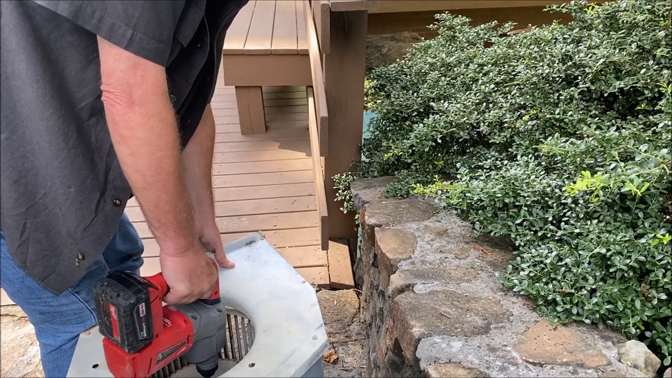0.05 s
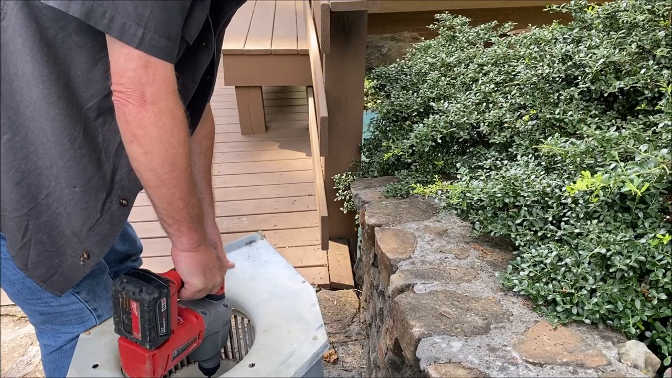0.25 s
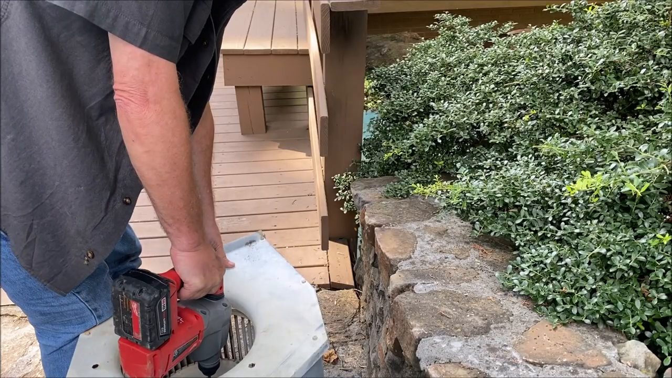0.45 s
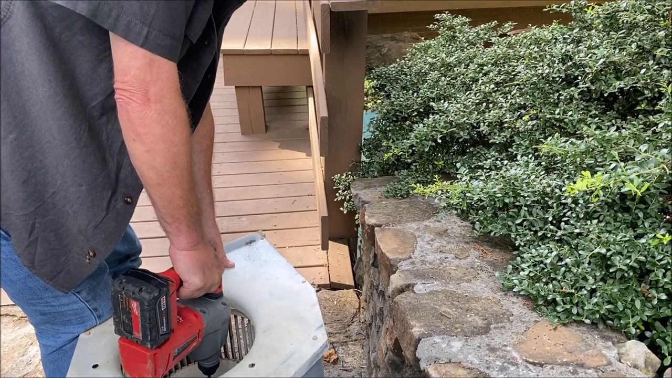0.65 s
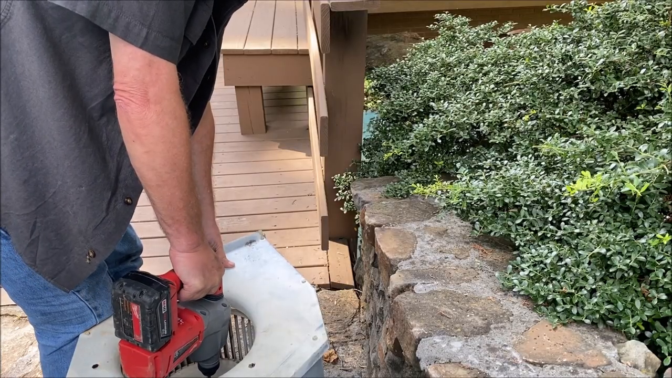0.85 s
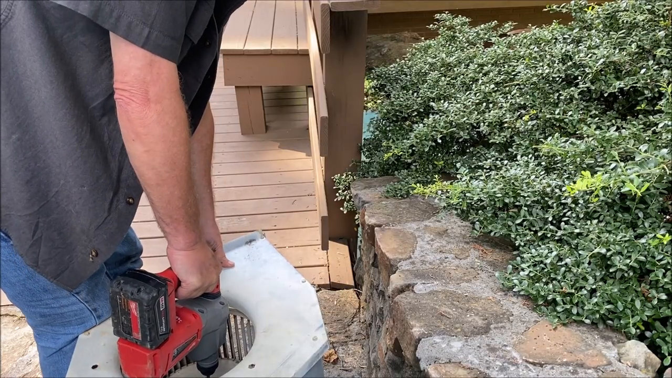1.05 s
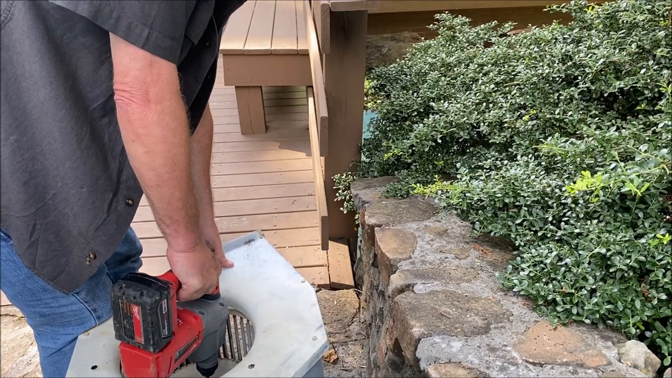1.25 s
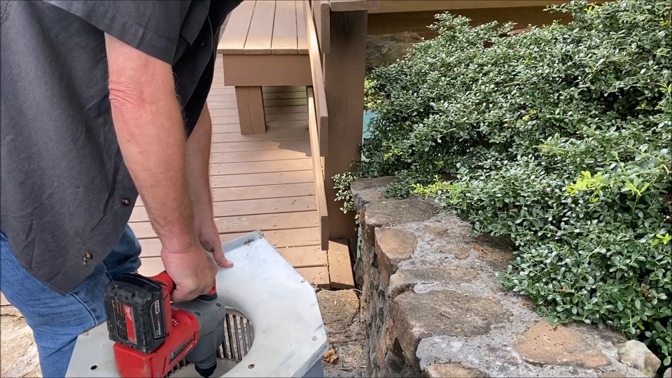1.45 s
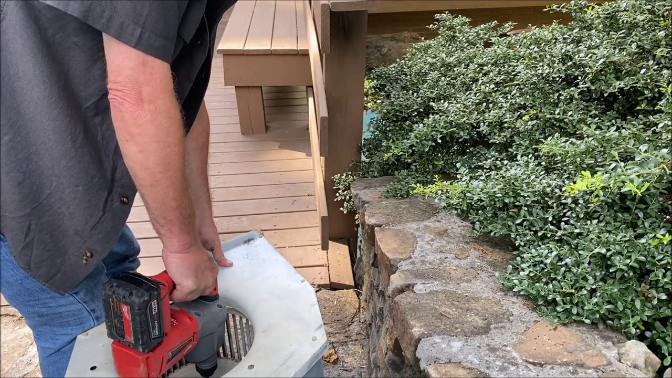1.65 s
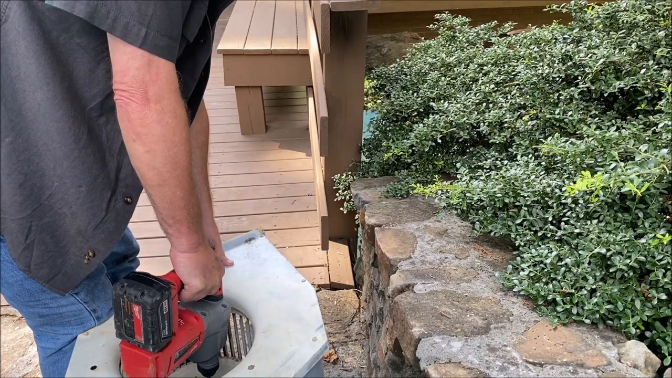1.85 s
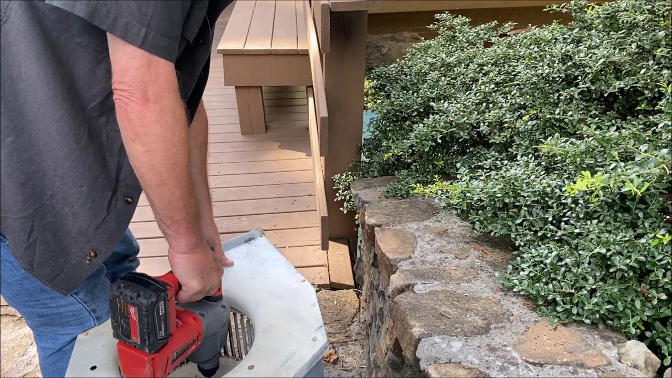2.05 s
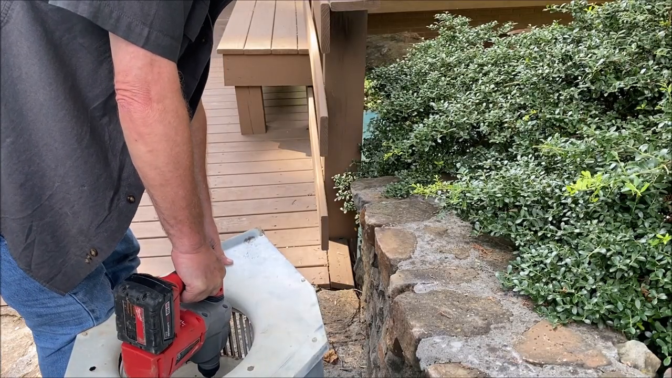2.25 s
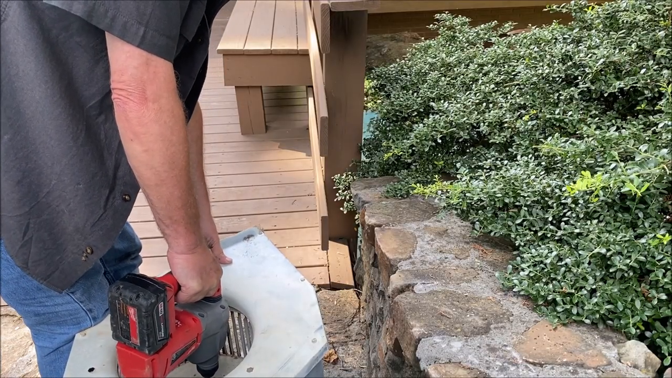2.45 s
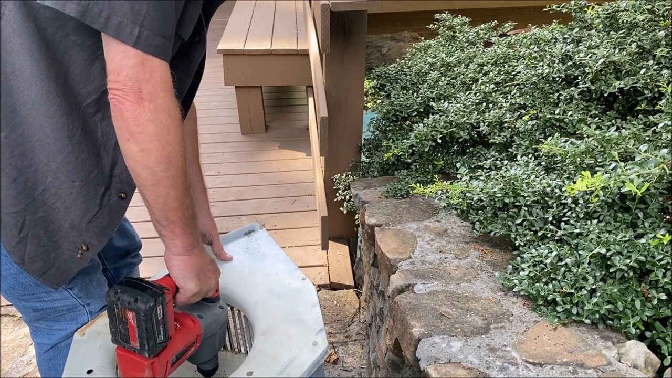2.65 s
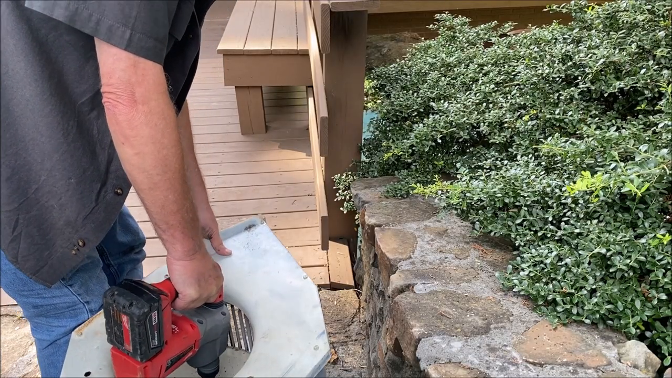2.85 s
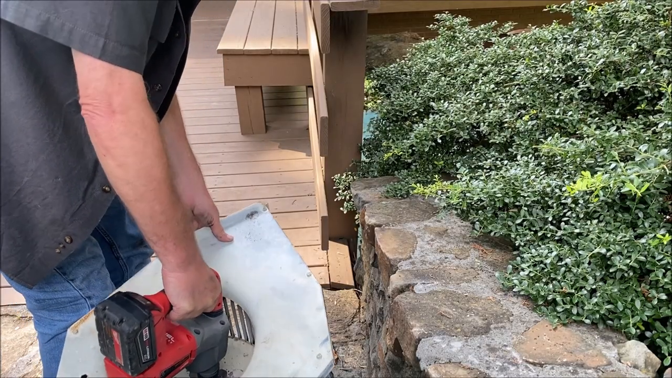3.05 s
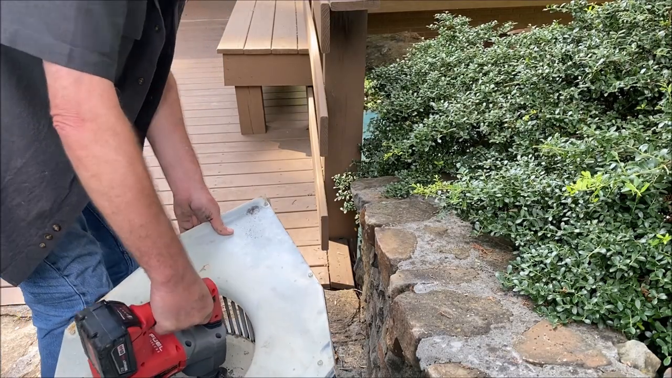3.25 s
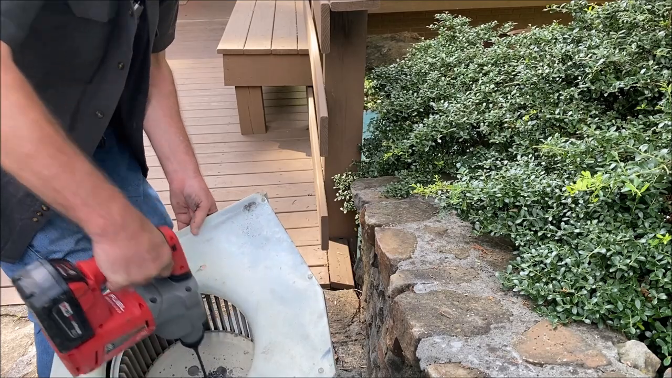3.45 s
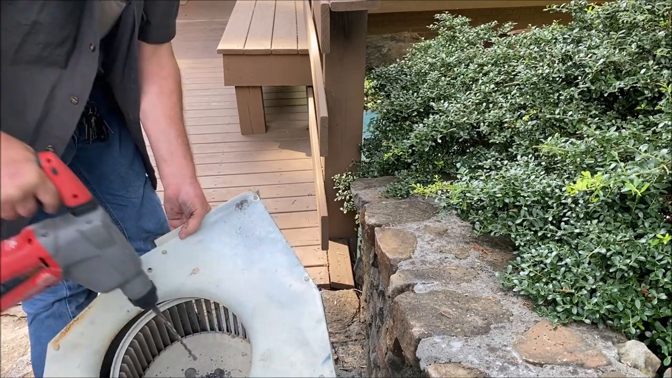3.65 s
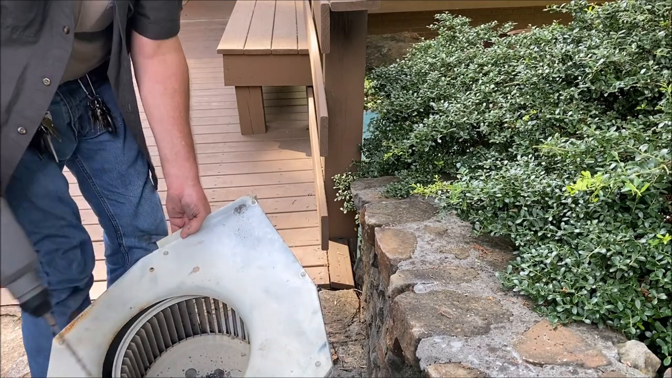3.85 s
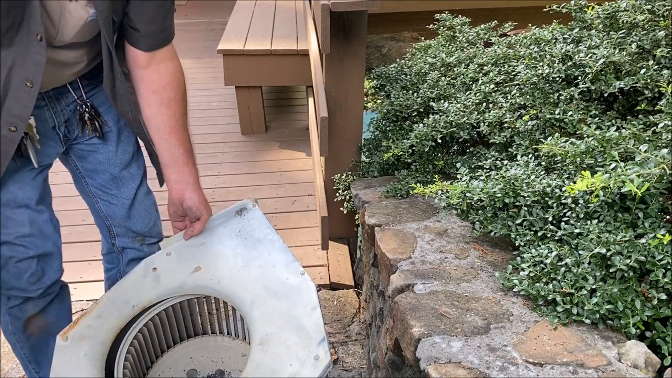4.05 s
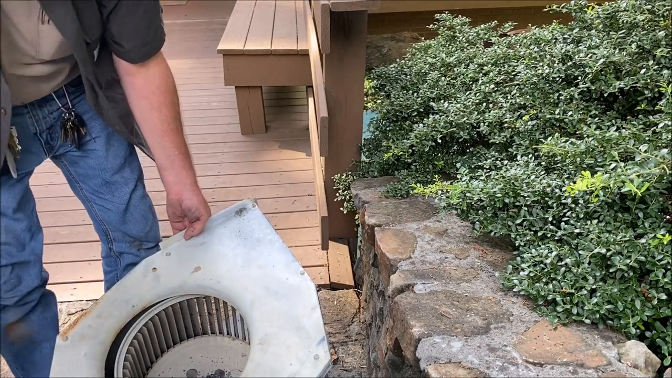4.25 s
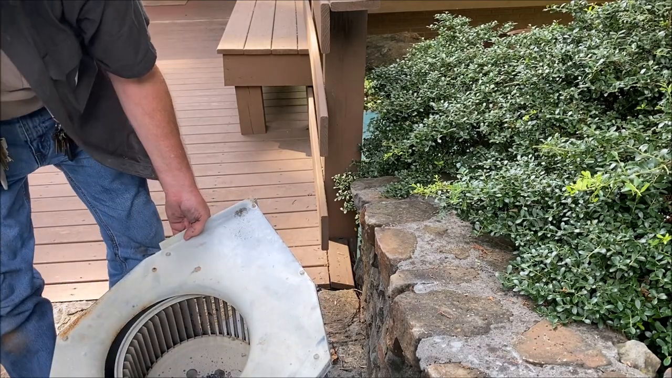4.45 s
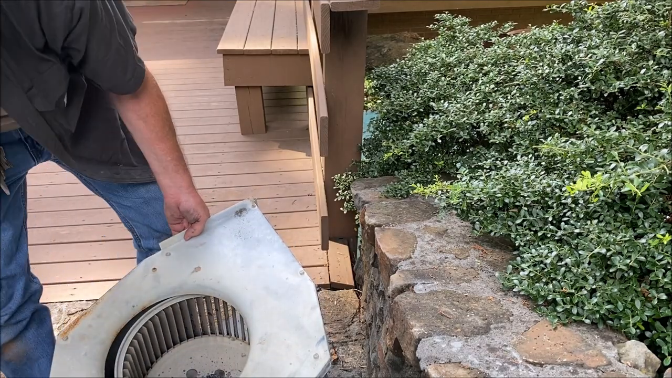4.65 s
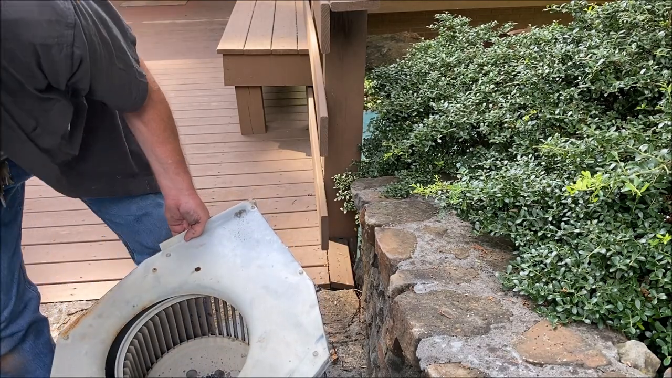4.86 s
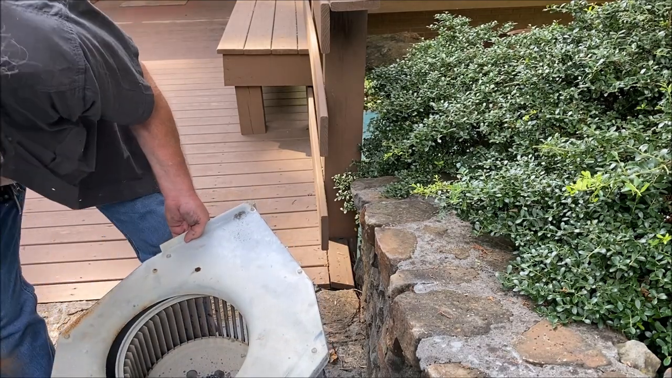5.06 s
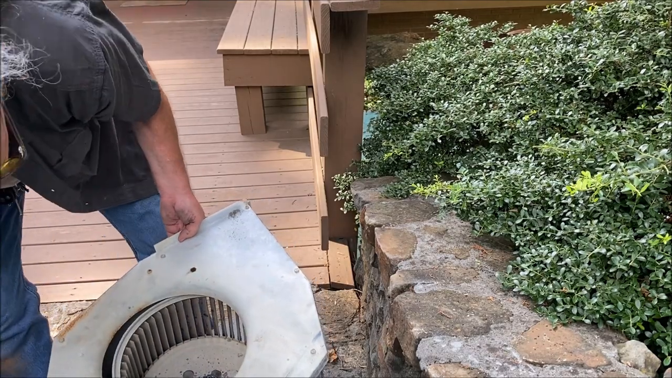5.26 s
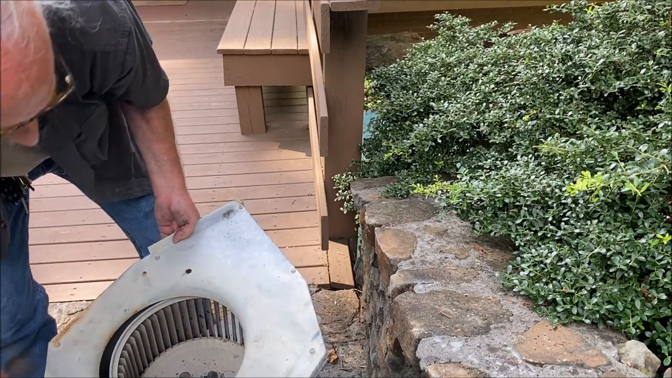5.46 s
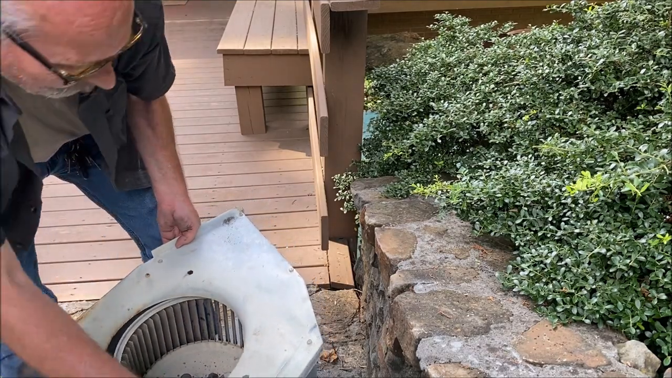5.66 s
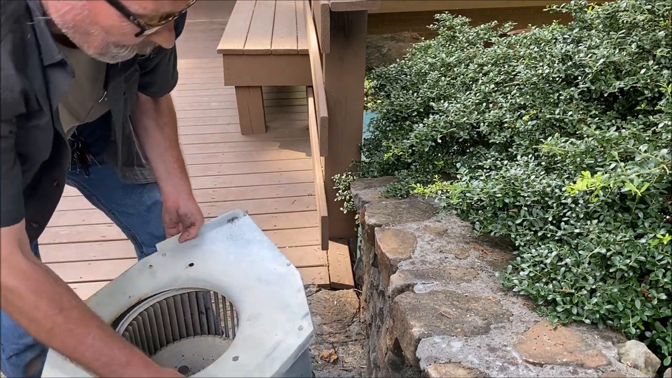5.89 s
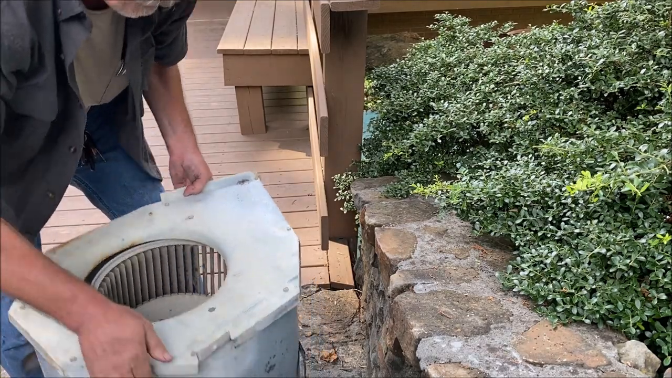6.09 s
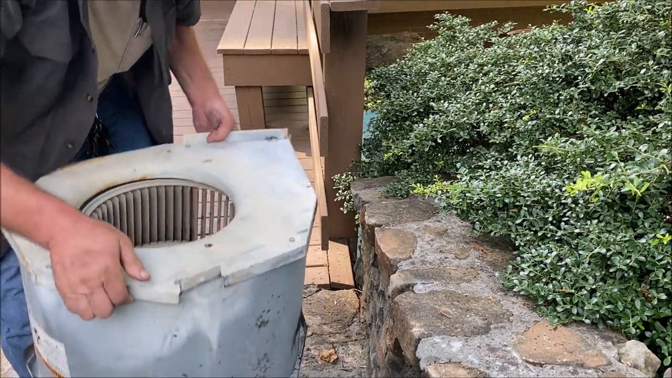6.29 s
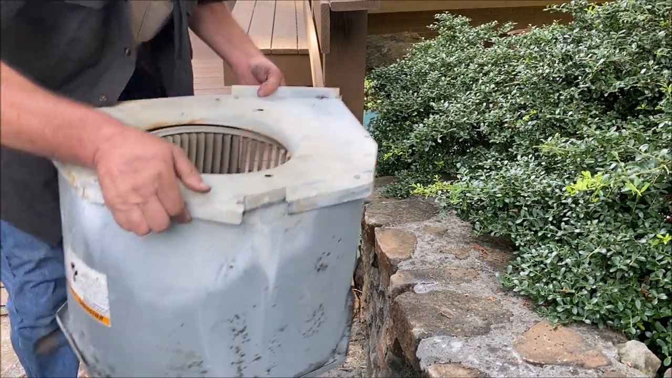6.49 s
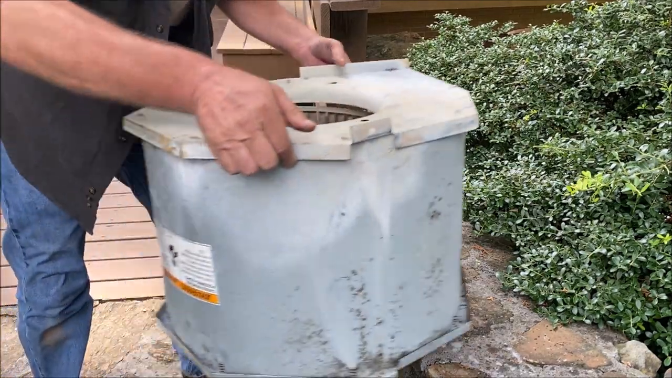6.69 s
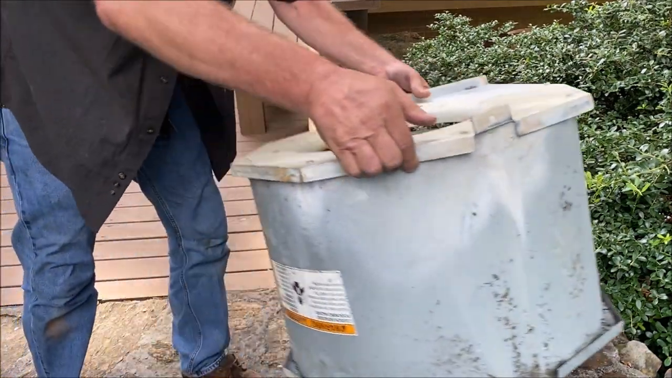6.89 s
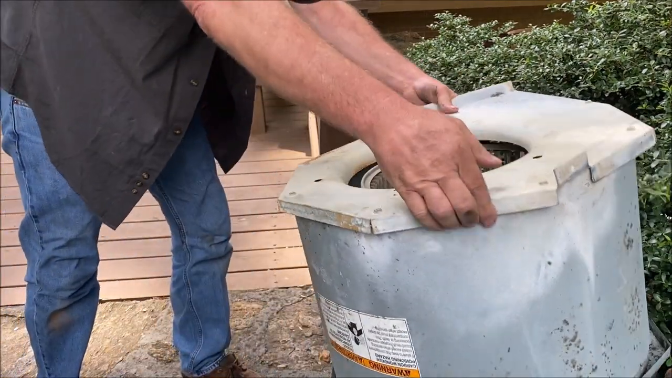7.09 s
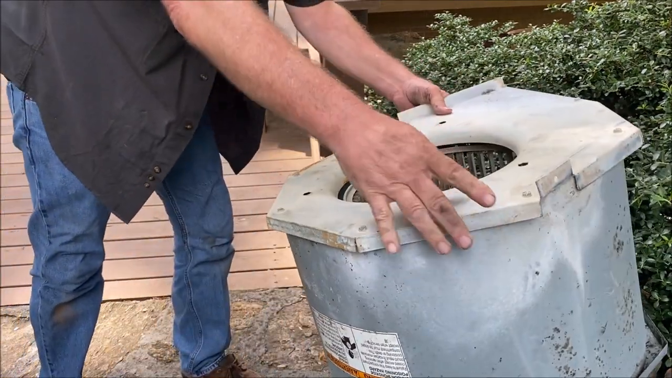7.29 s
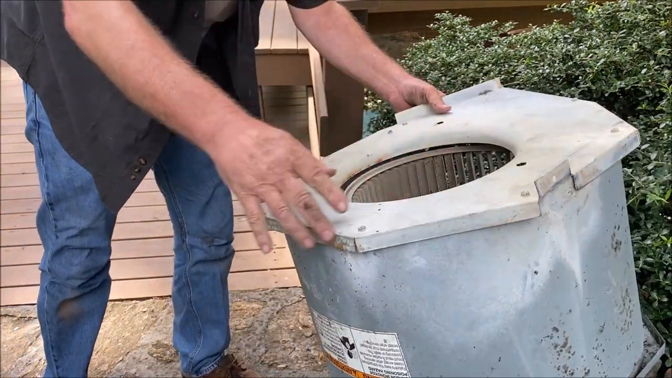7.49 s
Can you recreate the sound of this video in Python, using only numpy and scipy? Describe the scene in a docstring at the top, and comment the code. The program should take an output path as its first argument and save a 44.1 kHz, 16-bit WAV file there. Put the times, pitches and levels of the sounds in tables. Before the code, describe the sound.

Close outdoors on a wooden deck, a rotary hammer batters a fan shaft inside a thin metal drum, about fifty-five blows a second, with hum, clang and loose rattle. It presses harder, lifts off into uneven chatter and stops. Quiet air follows, with light knocks, faint keys and a tiny bird whistle. The tool is laid down with a sharp clatter; the drum is shuffled, lifted and set down with hollow metallic bangs.

```python
"""Hammered fan in a sheet-metal drum

A rotary hammer strikes the shaft of a fan inside a drum on a wooden deck outdoors, then lifts off. Periodic
blows excite damped modes, loose metal and a harmonic hum. The tool is laid down with a clatter and the drum
is handled, lifted and set down: noise bursts and sliding noise excite its modes. Keys jingle as flurries of
impulses, and a far bird whistles as a gliding sine. Two microphone ports, echoes and outdoor air surround all.
"""
import sys
import numpy as np
from scipy import signal
from scipy.fft import rfft, irfft
from scipy.io import wavfile
from scipy.ndimage import uniform_filter1d

SR = 44100
rng = np.random.default_rng(int(sys.argv[2]) if len(sys.argv) > 2 else 0)


def dump(signal):
    """Clip the signal to [-1, 1] and save it as 16-bit WAV at the path in sys.argv[1]."""
    limited = np.clip(np.atleast_2d(signal).T, -1, 1)
    pcm = np.round(limited * 32767).astype(np.int16)
    wavfile.write(sys.argv[1], SR, pcm)


N = 332073

# Blow rate: the motor sags under load, then runs down [t/s, rate/(blows per s)]
BLOW_RATE_CURVE = [(0, 56.4), (.25, 56.4), (.38, 55.6), (.7, 56.15), (1.5, 55.9), (2.2, 55.1),
                   (3.05, 54.65), (3.335, 53.0), (3.365, 41), (3.46, 25)]
# Pressure of the bit on the shaft [t/s, pressure/(0 to 1)]
PRESSURE_CURVE = [(1.3, 0.15), (1.7, 0.97)]
# Modes of shaft and fan [f/Hz, relative level held lightly/dB, relative level pressed hard/dB, t60/s]
SHAFT_MODES = [(884, -12, -7.5, 0.07), (1072, -11, -12, 0.062), (1269, -10, 0.5, .08),
               (1423, -6, -6.5, 0.1), (1663, 2, 1.5, 0.096), (2140, -12.5, -4, .03), (3124, -1, -16, 0.037),
               (3490, -20, -15, .04), (3730, -6, -12, .05), (4720, -7, -7, 0.019),
               (6280, -7.5, -10.5, 0.037)]
# Spectral density of loose blades and gears [f/Hz, relative level/dB per Hz]
RATTLE_SPECTRUM = [(35, -47), (60, -28), (217, -8), (842, -6.5), (1700, -5), (2090, -7), (7230, -12),
                   (8510, -19), (10800, -15), (13300, -15), (16000, -7)]
# Hum of the drum under the blows [t/s, third order level/dB, fourth order level/dB,
# sixth order level/dB, level of the wall hum/dB]
HUM_CURVE = [(0, -44.5, -38, -53, -32.5), (.3, -46, -36, -36, -34.5), (.85, -52, -41.5, -56.5, -34),
             (1.17, -42.5, -40, -48, -33), (1.52, -48.5, -45, -47.5, -32), (1.75, -39, -40.5, -38.5, -27.5),
             (2.0, -40.5, -49, -44, -31), (2.3, -51.5, -44.5, -48, -32), (2.66, -47, -53.5, -43.5, -32.5),
             (3.1, -59, -49.5, -69.5, -28.5)]
# Orders in the wall hum [multiple of blow rate, relative level held lightly/dB, relative level pressed hard/dB]
WALL_ORDERS = [(2, -10, -21), (5, -2.5, -17.5), (7, -7, -10.5), (8, 5, -3.5), (9, 6.5, -6.5), (10, 6, 2),
               (11, -2.5, -8.5), (12, 0.5, -5.5), (13, -9.5, -9), (14, -11, -10.5), (15, -19, -11),
               (16, -10.5, -14.5)]
# Spectral density of the outdoor floor [f/Hz, relative level/dB per Hz]
AIR_SPECTRUM = [(15, -39), (25, -14.5), (70, 1), (123, -12), (185, -13), (229, -27.5), (2350, -36.5),
                (4370, -39.5), (5570, -46.5), (7110, -47), (16000, -58.5)]
# Level of the drum's murmur while it is held [t/s, level/dB]
MURMUR_CURVE = [(3.4, -48), (3.56, -60.5), (4.0, -64.5), (4.8, -74.5), (5.36, -63.5), (5.48, -39),
                (5.66, -53), (6.35, -63.5), (6.62, -63), (7.1, -54), (7.26, -43), (7.53, -50.5)]
# Low modes of the drum [f/Hz, relative level/dB, t60/s]
DRUM_MODES = [(88.1, -11, 0.41), (164, -5.5, 0.12), (223.2, -6.5, 0.41), (277, 2, 0.077), (370, -12, 0.083),
              (448, -2.5, 0.039)]
# Hands and cloth sliding on the drum [loudest t/s, level/dB, time to fade 20 dB/s]
SLIDE_EVENTS = [(3.499, -50, 0.5), (4.79, -77, 0.06), (4.865, -84, 0.1), (5.011, -55.5, 0.4),
                (5.2, -65, 0.2), (5.37, -41.5, 0.18), (5.485, -44.5, 0.1961), (5.8, -71, 0.4),
                (6.6, -72.5, 1), (7.03, -56.5, 0.22), (7.15, -38.5, 0.2363), (7.41, -47, 0.23)]
# Spectral density of the sliding noise [f/Hz, relative level/dB per Hz]
SCUFF_SPECTRUM = [(240, -36.5), (400, -6), (1460, -5.5), (5430, -19.5), (6240, -20.5), (8370, -24.5),
                  (11200, -23.5), (13300, -20.5), (16000, -22)]
# Knocks [t/s, reference level/dB, relative bass level/dB, treble tilt/dB, reference t60/s,
# rise time constant/ms, body f/Hz]
KNOCK_EVENTS = [(3.618, -49, -23, -9, 0.18, 2, 1090), (3.844, -59, -15.5, 7.5, 0.26, 2.45, 1270),
                (4.076, -72, 16, -3, 0.072, 1.2, 2560), (4.732, -68.5, 1, 6, 0.38, 12, 715),
                (4.946, -57, 5, -3, 0.2, 0.41, 520), (5.096, -47, -2, 7.5, 0.059, 0.74, 2230),
                (5.279, -54, -11.5, -1, 0.14, 1.6, 1190), (5.3027, -25.5, -2, -1, 0.051, 0.38, 1210),
                (5.3335, -33, -10, 2, 0.035, 0.47, 4400), (5.344, -29, -5, 5, 0.044, 0.93, 3480),
                (5.352, -27, 2.5, 1.5, 0.061, 2, 555), (5.441, -36.5, 1.5, 4.5, 0.06, .3, 3470),
                (5.94, -46.5, -9, -8, 0.24, 5.7, 1900), (5.952, -47, -11, -21, 0.36, 2.9, 960),
                (6.356, -64, -6, 10.5, 0.44, 3.1, 2590), (6.46, -41, -1.5, -13.5, 0.27, 14, 810),
                (7.086, -26.5, -5, -2, 0.26, 1.5, 1010), (7.116, -27, -5, 0.5, 0.23, 5.3, 1760),
                (7.281, -41.5, -10, 2.5, 0.41, 6.9, 3250), (7.333, -32, -4.5, -6, 0.13, .8, 1350),
                (7.395, -45.5, -19, 9, 0.13, 2.4, 2820)]
# Spectral density of the knocks' noise [f/Hz, relative level/dB per Hz]
KNOCK_SPECTRUM = [(29, -38), (50, -12), (91, -4), (300, -2), (900, -6), (3410, -13), (8340, -26),
                  (10600, -21), (13500, -26), (16000, -18)]
# Higher modes of the drum's panels, rung by knocks [f/Hz]
PANEL_MODES = [508, 762, 887, 1120, 1306, 1777, 2089, 2900]
# Touches of the keys [t/s, strength level/dB]
KEY_TOUCHES = [(4.158, -82), (4.1936, -76.5), (4.23, -71)]
# Modes of the keys [f/Hz, relative level/dB, t60/s]
KEY_RESONANCES = [(2900, -3, .012), (5600, -2, .008), (6300, 0, .008), (7000, -3, .008)]
# Phase between the microphone ports [f/Hz, lead of the left port/rad]
PORT_LEAD = [(0, -3.5), (780, 1.3458), (2240, 2), (3530, -0.5), (4050, 7.5), (4740, 6.5), (5940, 5.5),
             (7060, 5), (10400, -0.1), (11400, 2), (13100, -13.5), (13700, -29.5), (15200, -3.5),
             (16600, -1)]
# Balance of the microphone ports [f/Hz, left minus right level/dB]
PORT_LEVELS = [(60, -7), (150, -2), (380, -2.5), (950, 0), (2380, 2), (5980, 2.5), (15000, -1)]

# The bit comes off the shaft: the walls fall quiet
LIFT_S, LIFT_TAKES_S, LIFT_WALL_DB, LIFT_CLANG_DB = 2.67, .09, -23, -13.5
# The trigger is let go, the motor runs down, then stops
RELEASE_S, RUNDOWN_DB_PER_S, STOP_S, STOP_DB_PER_S = 3.326, 116.5, 3.405, 349
RATTLE_DB, CLANG_DB, CLANG_PRESSED_DB = -34.5, -40.5, 5.5
# The bit slips for a moment and a panel sings out
SLIP_S, SLIP_LASTS_S, SLIP_HZ, SLIP_DB = 1.185, .04, 1487, 5.5
# Striker ticks, clearer once the bit is free and again as the motor runs down
TICK_DB, TICK_FREED_DB, TICK_IDLE_DB, TICK_T60_S = -43, 4, 6, .01
HUM_LAG_CYCLES = .42
REBOUND_CYCLES = .32
AIR_DB = -63
SLIDE_RISES_FASTER = 2.4  # ratio of rising slope to fading slope, in dB per s
CRACK_DB, CRACK_T60_S = 12, .011
DRUM_RING_DB, PANEL_RING_DB, PANEL_T60_S = -29, -29, .19
BIRD_S, BIRD_LASTS_S, BIRD_FROM_HZ, BIRD_TO_HZ, BIRD_DB = 4.5, .2, 3350, 4550, -82
ECHO_DB, ECHO_T60_S = -8, .06  # level ahead of the echoes' band limits
NOTCH_HZ, NOTCH_WIDTH_HZ, NOTCH_SHARE = 13300, 1500, .7
CUTOFF_HZ = 16150

NOW = np.arange(N) / SR  # t/s
OPPOSITE_SIDES = np.array([[1], [-1]])


def from_db(db):
    """Logarithmic level: amplitude gain grows tenfold every 20 dB."""
    return 10 ** (np.asarray(db) / 20)


def rms_one(x):
    """Normalisation by effective value: the result has rms 1."""
    return x / np.sqrt(np.mean(x ** 2) + 1e-20)


def in_time(rows):
    """Linear interpolation: each column of a curve, one value a sample."""
    s, *columns = np.transpose(rows)
    return [np.interp(NOW, s, column) for column in columns]


def at_hz(points):
    """Interpolation on a logarithmic frequency axis, one value for every FFT bin."""
    hz, value = np.transpose(points)
    return np.interp(np.log(np.fft.rfftfreq(N, 1 / SR) + 1), np.log(hz + 1), value)


def band(x, low_hz, high_hz):
    """Band limitation: a Butterworth filter passes one range of frequencies."""
    return signal.sosfilt(signal.butter(2, [low_hz, high_hz], "band", fs=SR, output="sos"), x)


def noise(spectrum, unlike=1.0):
    """Coloured noise of rms 1: scattering makes the two sides partly unlike between 2600 and 9000 Hz."""
    white = rng.standard_normal((2, N))
    both, apart = irfft(rfft(white) * from_db(at_hz(spectrum)), N)
    return rms_one(both + unlike * band(apart, 2600, 9000) * OPPOSITE_SIDES)


def drift(rate_hz):
    """Low-pass random process: two equal poles make noise wander slowly, with rms 1."""
    r = np.exp(-2 * np.pi * rate_hz / SR)
    wandering = signal.lfilter([1], [1, -2 * r, r * r], rng.standard_normal(N + SR))
    return rms_one(wandering[SR:])  # the first second lets the filter settle


def ring(strikes, modes, wander_db):
    """Modal superposition: a force drives damped resonators, each mode's share wandering slowly."""
    out = np.zeros(N)
    for k, (hz, level_db, t60) in enumerate(modes):
        r, w = from_db(-60 / (t60 * SR)), 2 * np.pi * hz / SR
        sign = (-1) ** k
        force = sign * strikes * from_db(level_db + wander_db * drift(1.2))
        out += signal.lfilter([0, np.sin(w)], [1, -2 * r * np.cos(w), r * r], force + 1e-18)
    return out


def evened(x):
    """Running normalisation: rms 1 over every tenth of a second."""
    return x / np.sqrt(uniform_filter1d(x ** 2, size=SR // 10) + 1e-12)


def outdoor_air():
    """Superposed noise fields: a common part and a weaker opposed part spread the outdoor floor in width."""
    field = noise(AIR_SPECTRUM) + .36 * noise(AIR_SPECTRUM) * OPPOSITE_SIDES
    return from_db(AIR_DB + .85 * drift(3.5)) * field


def hum(turn, press, lifted):
    """Harmonic series: periodic blows drive the drum at multiples of their rate; pressing shifts the colour."""
    third_db, fourth_db, sixth_db, wall_db = in_time(HUM_CURVE)
    wall = np.zeros(N)
    for k, light_db, hard_db in WALL_ORDERS:
        level_db = light_db + press * (hard_db - light_db) + 1.3 * drift(2.5) + .8 * drift(25)
        # the walls spread each blow over its cycle; the phases creep
        phase = .3 * k * k + .45 * drift(.8) + .18 * drift(25)
        wall += from_db(level_db) * np.cos(2 * np.pi * k * (turn - HUM_LAG_CYCLES) + phase)
    boom = from_db(third_db) * np.cos(2 * np.pi * 3 * turn)
    boom += from_db(fourth_db) * np.cos(2 * np.pi * 4 * turn)
    boom += from_db(sixth_db) * np.cos(2 * np.pi * 6 * turn)
    # the boom wavers, more so as the freed bit skips about
    skipping = from_db(1.6 * drift(4) + lifted * 4 * drift(22))
    return from_db(wall_db + LIFT_WALL_DB * lifted) * evened(wall) + np.sqrt(2) * skipping * boom


def loose_rattle(turn, blows, loose, press, lifted):
    """Amplitude modulation by impact: loose parts rattle after each blow and its rebound, then fade."""
    after_blow = np.exp(-(turn % 1) / .24)
    after_rebound = np.exp(-((turn - REBOUND_CYCLES) % 1) / .08)
    shake = .65 + after_blow + .3 * after_rebound
    uneven = from_db(.5 * drift(400) + .6 * drift(15))
    # the countless high modes answer every blow alike
    t = np.arange(SR // 10) / SR
    response = loose[:, :len(t)] * from_db(-60 * t / .041)
    crash = signal.fftconvolve(blows[None], response, axes=1)[:, :N]
    rattle = rms_one(loose * shake * uneven) + .45 * rms_one(crash)
    rattle += .55 * press * band(rattle, 7780, 13000)  # pressing hard brightens the rattle
    # the freed bit bounces: thuds and an uneven roar
    bounce = 1.1 * band(rattle, 80, 330) + .46 * band(rattle, 750, 2000)
    rattle += lifted * bounce * from_db(4 * drift(13))
    return rattle / np.std(band(rattle, 1670, 15350))


def shaft_clang(blows, rattle, press, lifted):
    """Forced modal vibration: blows ring shaft and fan, and contact pressure alters the mode levels."""
    held_hard = press * (1 - lifted)
    modes = [(hz, light_db + held_hard * (hard_db - light_db), t60)
             for hz, light_db, hard_db, t60 in SHAFT_MODES]
    chatter = (.005 + .03 * lifted) * rattle[0]  # the freed bit chatters unevenly
    clang = evened(band(ring(blows + chatter, modes, wander_db=2.2), 700, 9000))
    slipping = from_db(SLIP_DB) * np.exp(-((NOW - SLIP_S) / SLIP_LASTS_S) ** 2)
    clang += slipping * band(clang + rattle[0], SLIP_HZ / 1.15, SLIP_HZ * 1.13)
    return from_db(CLANG_DB + CLANG_PRESSED_DB * press + LIFT_CLANG_DB * lifted) * clang


def striker_ticks(strikes, loose, lifted):
    """Impulsive excitation: each blow opens a brief exponential burst of bright noise."""
    impulses = strikes * from_db(1.5 * rng.standard_normal(N))
    bursts = signal.lfilter([1], [1, -from_db(-60 / (TICK_T60_S * SR))], impulses)
    level_db = TICK_DB + TICK_FREED_DB * lifted + TICK_IDLE_DB * (NOW > RELEASE_S)
    return from_db(level_db) * bursts * rms_one(band(loose, 4500, 16000))


def hammer():
    """Periodic impact: even blows, each with a weaker rebound, drive hum, clang, rattle and ticks."""
    press, = in_time(PRESSURE_CURVE)
    lifted = np.clip((NOW - LIFT_S) / LIFT_TAKES_S, 0, 1)
    stopping = from_db(-STOP_DB_PER_S * np.maximum(NOW - STOP_S, 0))
    running = stopping * from_db(-RUNDOWN_DB_PER_S * np.maximum(NOW - RELEASE_S, 0))
    turn = np.cumsum(in_time(BLOW_RATE_CURVE)[0]) / SR + .64  # elapsed blow cycles
    strikes = np.diff(np.floor(turn), prepend=0)
    rebounds = np.diff(np.floor(turn - REBOUND_CYCLES), prepend=0)
    blows = strikes * from_db(.97 * rng.standard_normal(N))
    blows += .5 * rebounds * from_db(.5 * rng.standard_normal(N))
    loose = noise(RATTLE_SPECTRUM)
    rattle = loose_rattle(turn, blows, loose, press, lifted)
    body = hum(turn, press, lifted) + shaft_clang(blows, rattle, press, lifted)
    body = body + from_db(RATTLE_DB) * rattle
    return running * body + stopping * striker_ticks(strikes, loose, lifted)


def handling():
    """Friction noise: slides swell fast and fade slower, while random force makes the held drum murmur."""
    slides = np.zeros(N)
    for s, db, fade_s in SLIDE_EVENTS:
        away_s = np.maximum(NOW - s, SLIDE_RISES_FASTER * (s - NOW))
        slides += from_db(db - 20 / fade_s * away_s)
    grit = from_db(2 * drift(32) + drift(330))
    scuff = noise(SCUFF_SPECTRUM, unlike=.98) * slides * grit
    murmur = rms_one(ring(rng.standard_normal(N), DRUM_MODES, wander_db=4))
    murmur *= from_db(in_time(MURMUR_CURVE)[0])
    return scuff + murmur * (NOW >= MURMUR_CURVE[0][0])


def knocks():
    """Transient response of thin metal: a crack and a dense crash, longer bass, then ringing drum and panels."""
    crash, t = noise(KNOCK_SPECTRUM, unlike=.95), np.arange(SR // 2) / SR
    # the many close modes of thin metal
    sheet_t = t[:len(t) // 4]
    sheet = rng.standard_normal((1, len(sheet_t))) * from_db(-60 * sheet_t / .06)
    crash = crash + .5 * rms_one(signal.fftconvolve(crash, sheet, axes=1)[:, :N])
    bass = rms_one(band(crash, 60, 490))
    middle = rms_one(band(crash, 600, 5270))
    treble = rms_one(band(crash, 3500, 17000))
    out, strike, tap = np.zeros((2, N)), np.zeros(N), np.zeros(N)
    for s, level_db, bass_db, treble_db, t60, rise_ms, body_hz in KNOCK_EVENTS:
        start = round(s * SR)
        part = slice(start, start + len(t))
        swell = 1 - np.exp(-1000 * t / max(rise_ms, .1))

        def fade(stretch):
            """Exponential decay: the reference t60 is stretched by a factor."""
            return (swell * from_db(-60 * t / (stretch * t60)))[:N - start]

        panel = rms_one(band(crash[:, part], body_hz / 1.4, body_hz * 1.4))
        # a sudden knock sets the struck panel ringing briefly
        crack = np.sin(2 * np.pi * body_hz * t) * from_db(CRACK_DB - 60 * t / CRACK_T60_S)
        crack = (crack / (1 + rise_ms))[:N - start]
        shiver = fade(1) + .26 * fade(1.47)  # the sheet shivers on after the crack
        sound = crack + from_db(.43 * treble_db) * middle[:, part] * shiver
        sound += .72 * panel * fade(1.49)
        sound += from_db(treble_db) * treble[:, part] * fade(.84)
        sound += from_db(bass_db) * bass[:, part] * fade(2.26)
        out[:, part] += from_db(level_db) * sound
        strike[part] += from_db(level_db + bass_db) * fade(.33)
        tap[part] += from_db(level_db) * fade(.25)
    panel_modes = [(hz, PANEL_RING_DB, PANEL_T60_S) for hz in PANEL_MODES]
    panels = ring(tap * rng.standard_normal(N), panel_modes, wander_db=3)
    drum = ring(strike * rng.standard_normal(N), DRUM_MODES, wander_db=2.5)
    return out * from_db(1.7 * drift(140)) + from_db(DRUM_RING_DB) * drum + panels


def keys():
    """Sparse impulsive excitation: keys on a belt jingle, each touch a short flurry of ticks."""
    touches = np.zeros(N)
    for s, db in KEY_TOUCHES:
        touches[round(s * SR)] = from_db(db)
    fading = signal.lfilter([1], [1, -np.exp(-1 / (.011 * SR))], touches)
    flurry = fading * rng.standard_normal(N) * (rng.random(N) < .1)  # one sample in ten ticks
    return ring(flurry, KEY_RESONANCES, wander_db=4) + 2.9 * flurry


def bird():
    """Frequency modulation: one far whistle steps up halfway and levels off."""
    along = np.clip((NOW - BIRD_S) / BIRD_LASTS_S, 0, 1)
    hz = BIRD_FROM_HZ + (BIRD_TO_HZ - BIRD_FROM_HZ) / (1 + np.exp(20 * (.5 - along)))
    whistle = np.sin(2 * np.pi * np.cumsum(hz) / SR)
    return from_db(BIRD_DB + 2 * drift(30)) * np.sin(np.pi * along) * whistle


def ports(x):
    """Interchannel phase and level: two microphone ports hear each source differently at each frequency."""
    half = np.exp(.5j * at_hz(PORT_LEAD)) * from_db(.5 * at_hz(PORT_LEVELS))
    return irfft(rfft(x) * np.array([half, 1 / half]), N)


def deck(x):
    """Diffuse reflection: boards, bench and stone wall scatter short echoes, unlike at each port, weak in bass."""
    t = np.arange(SR // 8) / SR
    scatter = rng.standard_normal((2, len(t))) * from_db(-60 * t / ECHO_T60_S) * (t > .002)
    scatter = scatter / np.sqrt(np.sum(scatter ** 2, axis=1, keepdims=True))
    scatter = band(scatter, 765, 9000)
    return from_db(ECHO_DB) * signal.fftconvolve(x, scatter, axes=1)[:, :N]


def scene():
    """Linear superposition: direct sources, their echoes from the deck and the outdoor floor add."""
    tool = hammer()
    rest = handling() + knocks() + keys() + bird()
    # the hammer is long silent by the second half
    direct = ports(tool) * (np.arange(N) < N // 2) + ports(rest)
    return direct + deck(tool + rest) + outdoor_air()


def record(dry):
    """Linear filtering: the deepest bass is removed, a notch thins the high treble, a steep low-pass ends the band."""
    dry = signal.sosfilt(signal.butter(2, 40, "high", fs=SR, output="sos"), dry)
    peak = signal.iirpeak(NOTCH_HZ, NOTCH_HZ / NOTCH_WIDTH_HZ, fs=SR)
    dry = dry - NOTCH_SHARE * signal.lfilter(*peak, dry)
    return signal.sosfilt(signal.cheby2(16, 70, CUTOFF_HZ, fs=SR, output="sos"), dry)


dry = scene()
out = record(dry)
dump(out)
```